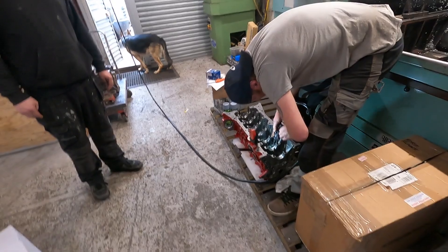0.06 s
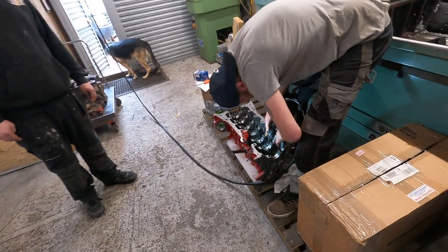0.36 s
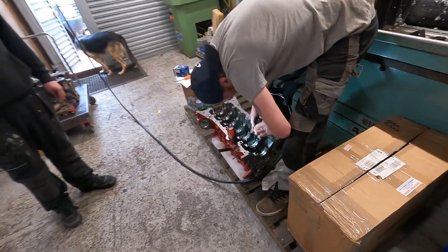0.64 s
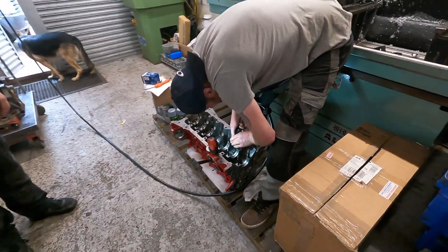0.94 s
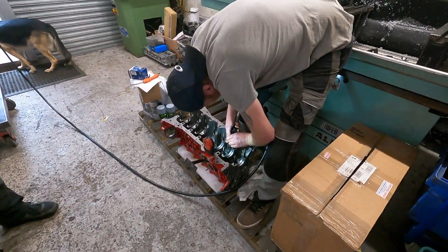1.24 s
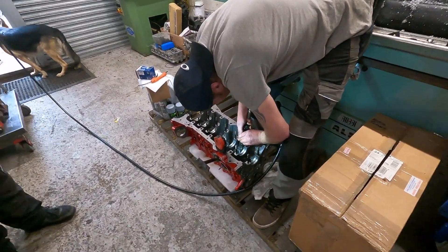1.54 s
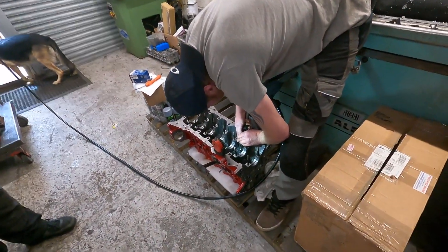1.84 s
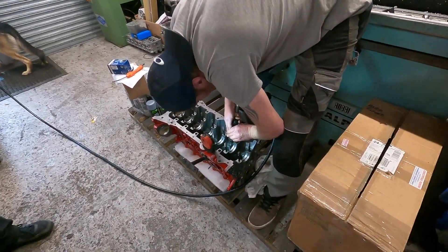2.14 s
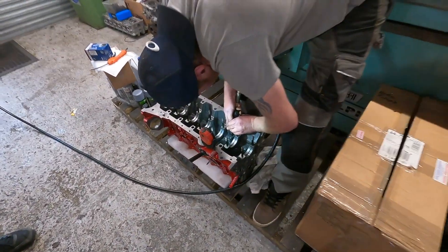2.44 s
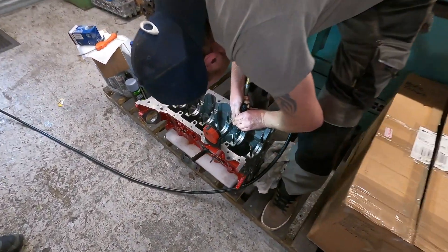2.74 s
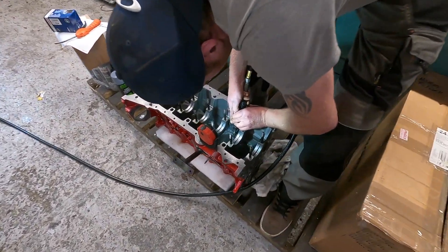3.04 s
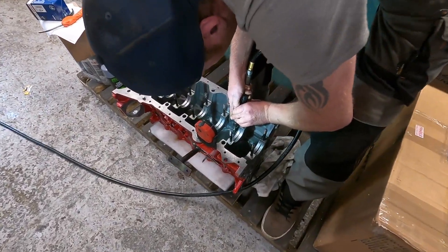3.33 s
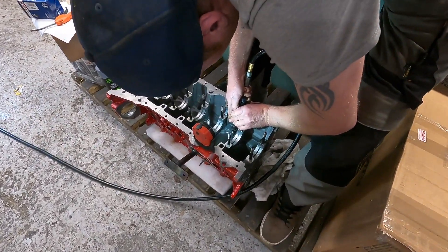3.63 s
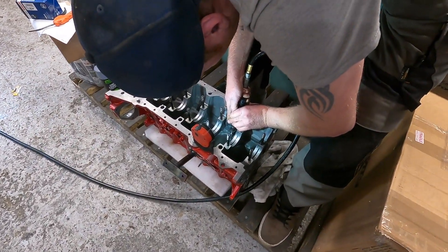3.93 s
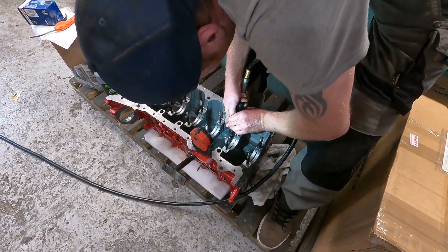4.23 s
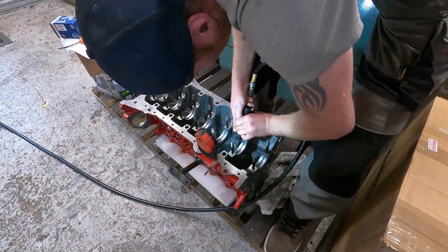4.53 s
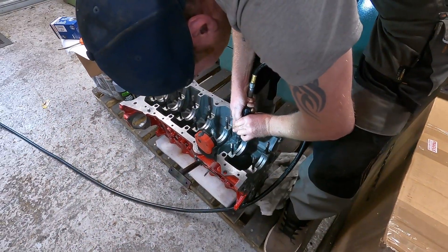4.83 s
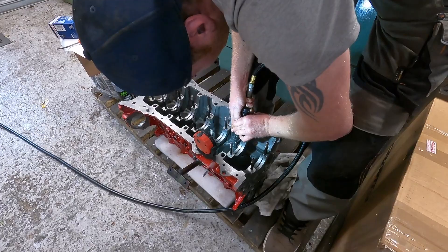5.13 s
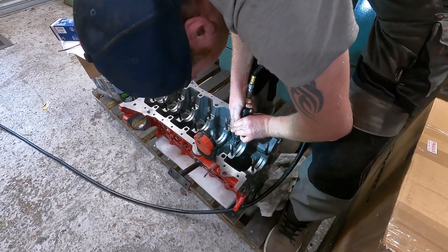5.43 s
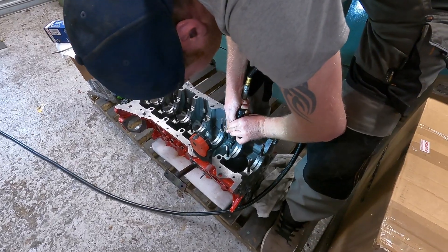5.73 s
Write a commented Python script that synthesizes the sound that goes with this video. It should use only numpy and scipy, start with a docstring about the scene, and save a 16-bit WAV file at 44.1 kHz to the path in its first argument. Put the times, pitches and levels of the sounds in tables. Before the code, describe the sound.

After soft scuffs and a leak of air, an air grinder whines up and grinds metal, chattering roughly, then cutting smoothly.

```python
"""An air die grinder works inside an iron engine block, heard close up in a workshop.
Someone shuffles about; the throttle cracks open and leaks air, then the vane motor spins up to a whine,
one puff of air per vane. The burr bounces on the iron and rasps off chips, then settles into a smooth
cut where each deeper bite slows the vanes and swells the whine."""
import sys
import numpy as np
from scipy import signal
from scipy.fft import rfft, irfft
from scipy.io import wavfile

SR = 44100
rng = np.random.default_rng(int(sys.argv[2]) if len(sys.argv) > 2 else 0)


def to_wav(sig):
    """Store sig (one row per channel, or 1-D mono) as 16-bit WAV at the path in sys.argv[1].

    Samples outside -1..1 are clipped; the rate is SR.
    """
    pcm = np.clip(np.atleast_2d(sig), -1, 1) * 32767
    pcm = np.round(pcm).astype(np.int16)
    wavfile.write(sys.argv[1], SR, pcm.T)  # frames by channels


N = 258867
T = np.arange(N) / SR
HZ = np.fft.rfftfreq(N, 1 / SR)
VANES = 5
START_S, SETTLE_S = 1.855, 4.37  # rotor breaks free; chatter stops

# thumb on the throttle: time_s, opening (0-1)
THROTTLE = [(1.27, 0.01), (1.75, 0.35), (1.82, 0.88), (1.89, 0.97)]
# motor speed before sag and sway: time_s, vane_hz
SPEED = [(1.855, 90), (1.903, 546), (1.95, 775), (2.05, 942), (2.28, 1143), (2.43, 1222), (2.62, 1270),
         (3.3, 1250), (3.7, 1223), (4.0, 1254), (4.36, 1279), (4.372, 1230)]
# burr pressure on the iron: time_s, pressure_db
PRESSURE = [(1.95, -9), (2.35, -2), (2.8, -1), (3.3, -2), (3.87, -1), (4.2, -2.5), (4.45, -8), (5.3, -6.5),
            (5.7, -2.5)]
# spectrum of scrape and air spit: freq_hz, density_db
BRIGHT_HISS = [(2500, -33), (3600, -6.5), (4500, -3.5), (5400, -1.5), (7600, -1), (8400, -5.5), (9300, -10),
               (12200, -11.5), (14000, -26), (15600, -44)]
# spectrum of the shaken block: freq_hz, density_db
RUMBLE = [(20, -10), (45, -2), (90, 0), (160, -4.5), (300, -21.5), (600, -30)]


def amp(db):
    """Decibels to gain."""
    return 10 ** (np.asarray(db) / 20)


def unit(x):
    """Scale to rms 1."""
    return x / np.sqrt(np.mean(x ** 2) + 1e-20)


def read(points, hz):
    """Interpolate on a log-frequency axis."""
    freq_hz, value = np.transpose(points)
    return np.interp(np.log(hz + 1), np.log(freq_hz + 1), value)


def curve(rows, column=1):
    """One column of a time table, per sample."""
    rows = np.array(rows)
    return np.interp(T, rows[:, 0], rows[:, column])


def level(rows, column):
    """Gain from a dB column, falling 500 dB/s outside the table's times."""
    outside_s = np.maximum(rows[0][0] - T, 0) + np.maximum(T - rows[-1][0], 0)
    return amp(curve(rows, column) - 500 * outside_s)


def ramp(start_s, length_s):
    """Linear rise from 0 to 1."""
    return np.clip((T - start_s) / length_s, 0, 1)


def held(start_s, end_s, attack_s, t60_s):
    """Attack, hold until end_s, decay."""
    return ramp(start_s, attack_s) * amp(-60 * np.maximum(T - end_s, 0) / t60_s)


def noise():
    """White noise."""
    return rng.standard_normal(N)


def colour(x, spectrum):
    """Filter by a dB spectrum; rms 1."""
    return unit(irfft(rfft(x) * amp(read(spectrum, HZ)), N))


def wander(rate_hz):
    """Random drift up to rate_hz; rms 1."""
    return unit(irfft(rfft(noise()) / (1 + (HZ / rate_hz) ** 4), N))


def resonate(x, hz, width_hz):
    """Steep resonance whose centre may glide; rms 1."""
    carrier = np.exp(2j * np.pi * np.cumsum(hz * np.ones(N)) / SR)
    pole = np.exp(-np.pi * width_hz / SR)
    baseband = signal.lfilter([(1 - pole) ** 2], [1, -2 * pole, pole * pole], x / carrier)
    return unit((carrier * baseband).real)


def hush():
    """Steady background noise of the shop."""
    spectrum = [(25, -9), (80, -11), (150, 4), (400, -8), (1200, -3.5), (1900, -9), (2400, -5), (3400, -12),
                (4500, -5.5), (7500, -10.5), (9700, -15.5), (12200, -17), (14000, -24), (15600, -40)]  # freq_hz, density_db
    return amp(-50.5) * colour(noise(), spectrum)


def footwork(scuff_t60_s=0.68):
    """Shoes and clothes shuffle; each soft knock carries a scuff."""
    shuffles = [(.1, 0.13, -47), (0.28, .04, -48), (0.385, 0.13, -49.5), (0.548, 0.035, -48.5),
                (0.702, 0.089, -47), (0.928, .07, -53), (1.32, .13, -51.5), (1.594, .15, -43)]  # start_s, length_s, relative_db
    cloth_spectrum = [(65, -54), (110, -24), (139, -2.5), (189, -4), (382, -2), (470, -7), (712, -7),
                      (773, -8), (3000, -18), (3900, -50), (6600, -120)]  # freq_hz, density_db
    knocks = [(.304, -43, 70, .06, -71), (0.732, -43, 165, 0.1, -46), (.89, -55, 38, .4, -74),
              (.945, -49, 522, 0.19, -57), (1.614, -39, 343, .07, -69), (1.684, -43, 300, .08, -59)]  # start_s, peak_db, pitch_hz, t60_s, scuff_db
    grit_spectrum = [(100, -23), (400, 5), (1300, -3), (3000, -8), (7000, -11), (14000, -34)]
    moves = sum(amp(db) * held(s, s + length_s, .025, 0.27) for s, length_s, db in shuffles)
    out = amp(-2) * moves * colour(noise() * (1 + 0.2 * wander(56)), cloth_spectrum)
    grit = colour(noise(), grit_spectrum)
    for start_s, peak_db, pitch_hz, t60_s, scuff_db in knocks:
        age_s = np.maximum(T - start_s, 0)
        out += amp(peak_db - 60 * age_s / t60_s) * np.sin(2 * np.pi * pitch_hz * age_s)
        out += amp(scuff_db - 60 * age_s / scuff_t60_s) * (T > start_s) * grit
    return out


def drone(from_hz=108, to_hz=126):
    """A brief low drone swells, rises a little and fades."""
    progress = ramp(1.06, 0.36)
    hz = (from_hz + (to_hz - from_hz) * progress) * (1 + 0.064 * wander(40))
    return amp(-50) * np.sin(np.pi * progress) ** 2 * unit(np.sin(2 * np.pi * np.cumsum(hz) / SR))


def airflow(range_db):
    """Throttle gain: about range_db down when cracked, 1 at full opening."""
    return ramp(THROTTLE[0][0], 0.016) * amp(-range_db * (1 - curve(THROTTLE)))


def leak():
    """Air slips past the throttle with a breathy whistle that fades during spin-up."""
    spectrum = [(290, -53), (500, -17), (560, -14), (724, -14.5), (1450, -1), (1830, -11), (2360, -1),
                (2880, -10), (3370, -8.5), (3880, -12.5), (5160, -8.5), (7470, -12), (9380, -22.5),
                (11400, -22.5), (15000, -42)]  # freq_hz, density_db
    open_s = THROTTLE[0][0]
    rush = amp(-29) * airflow(range_db=10) * held(open_s, 2.17, .005, t60_s=1.6)
    whistle = amp(-28.5) * airflow(range_db=26) * held(open_s, 2.254, .005, t60_s=0.99)
    return rush * colour(noise(), spectrum) + whistle * resonate(noise(), hz=2395, width_hz=75)


def motor_air():
    """Strength of the air passing through the motor."""
    return amp(-22.5) * airflow(range_db=45)


def exhaust(turns, puff_depth=.3):
    """Spent air hisses out in puffs and howls in the crankcase, surging as the chatter stops."""
    spectrum = [(100, -38), (200, -20.5), (330, -13.5), (450, -21.5), (600, -14.5), (850, -17), (1050, -6),
                (1750, -4.5), (2400, 0), (3500, -3), (5200, -7.5), (7200, -9), (9000, -18), (12500, -20),
                (14200, -25), (15700, -43)]  # freq_hz, density_db
    # exhaust and crankcase resonances: centre_hz, width_hz, relative_db, smooth_cut_gain_db
    cavity_modes = [(1138, 98, -7.5, 2.5), (2059, 230, 0, -1.5), (2318, 240, -2, 2.5), (2505, 170, -0.5, 3),
                    (2728, 150, -3, 4), (2947, 120, -1.5, 3)]
    settled = ramp(SETTLE_S, .01)
    jet = noise() * (1 + puff_depth * np.cos(2 * np.pi * VANES * turns))
    rush = amp(-0.16 + 0.76 * settled) * colour(jet, spectrum)
    howl = sum(amp(db + gain_db * ramp(SETTLE_S, 0.0086)) * resonate(noise(), hz, width_hz)
               for hz, width_hz, db, gain_db in cavity_modes)
    surge_db = 4 * held(SETTLE_S, SETTLE_S + 0.024, .005, t60_s=0.27)
    swell_db = 0.5 * settled * wander(8)
    gusts = 1 + 0.037 * wander(40)
    return motor_air() * gusts * (rush + amp(-9 + surge_db + swell_db) * howl)


def spit(attack_s=0.026):
    """Bright spit of air as the throttle is squeezed wide."""
    wide_s = THROTTLE[2][0]
    envelope = held(wide_s - attack_s / 2, wide_s + attack_s / 2, attack_s, t60_s=0.59)
    return amp(-31) * envelope * colour(noise(), BRIGHT_HISS)


def cough(attack_s=.014, length_s=0.077):
    """The rotor breaks free with a burst of air and a faint after-rush."""
    spectrum = [(40, -23), (80, -6), (180, -5), (280, 5), (420, -4), (550, -3), (1200, 4.5), (1700, -4),
                (3000, -39)]  # freq_hz, density_db
    burst = amp(-30) * held(START_S, START_S + length_s, attack_s, t60_s=0.25)
    after_rush = amp(-51) * held(START_S, START_S + length_s, attack_s, t60_s=1.6)
    return (burst + after_rush) * colour(noise(), spectrum)


def kick(pitch_hz=278):
    """The starting rotor's jolt thumps through the block."""
    ring = np.sqrt(2) * amp(-29) * np.sin(2 * np.pi * pitch_hz * T)
    thud = amp(-38) * colour(noise(), RUMBLE)
    return held(START_S, START_S + 0.038, 0.018, t60_s=0.12) * (ring + thud)


def bite_depth():
    """The burr digs in and eases off during the smooth cut."""
    bites = [(4.555, 0.21, 0.98), (4.799, 0.091, 0.74), (5.15, .22, .85), (5.286, 0.1593, 0.47),
             (5.85, 0.12, 0.36)]  # middle_s, length_s, depth (0-1)
    return sum(depth * np.cos(np.pi * np.clip((T - middle_s) / length_s, -.5, .5)) ** 2
               for middle_s, length_s, depth in bites)


def shaft_turns(sag_hz=19, jitter=0.0027, sway=0.00299):
    """Running count of rotor turns; speed trembles, sways in the hand and sags at each bite."""
    vane_hz = curve(SPEED) - sag_hz * bite_depth()
    return np.cumsum(vane_hz * (1 + jitter * wander(46) + sway * wander(8))) / SR / VANES


def vane_gain(bite_db=9.5, fade_db_per_s=0.5):
    """The whine grows with speed, loses strength to the chatter and returns in the smooth cut."""
    vane_hz = curve(SPEED)
    free_db = np.maximum(-28 - 20 * (1 - vane_hz / vane_hz.max()), -35)
    rough_db = free_db - 9 * ramp(2.4, .4)
    smooth_db = -30 + bite_db * bite_depth() - fade_db_per_s * (T - SETTLE_S)
    settled = ramp(SETTLE_S, .006)
    return ramp(START_S, 0.014) * amp((1 - settled) * rough_db + settled * smooth_db)


def whine(turns, flutter=0.16, slip_turns=0.014):
    """One puff per vane, sputtering at first; unequal vanes and burr teeth add other shaft orders."""
    partials = [(2.5, -41, 10.5), (3, -34.5, 7.5), (4, -47, -3), (5.5, -22, 4.5), (6.5, -42, -10),
                (7, -29, -5), (10, -10, 2), (11, -35, 2), (12, -22.5, 9.5)]  # shaft_order, relative_db, smooth_cut_gain_db
    sputter = .6 * held(START_S, START_S + 0.071, .01, t60_s=1.418)
    vanes = vane_gain() * np.sin(2 * np.pi * VANES * turns + sputter * wander(120))
    orders = np.zeros(N)
    for order, db, gain_db in partials:
        cycles = order * (turns + slip_turns * wander(36)) + rng.random()
        gain = amp(db + gain_db * ramp(SETTLE_S, .01)) * (1 + 0.49 * wander(28))
        orders += gain * np.sin(2 * np.pi * cycles)
    vanes *= 1 + (flutter + sputter) * wander(45)
    up_to_speed = ramp(1.94, 0.5)
    return np.sqrt(2) * (vanes + amp(-.5) * up_to_speed * motor_air() * orders)


def rasp(turns, chips_per_s=17000):
    """Teeth tear off chips and squeal; the scrape quietens and a thin hiss near 13 kHz comes in."""
    tooth_squeal = [(2.1, 7300, -41), (2.5, 7200, -37), (2.9, 6160, -28.5), (3.4, 5938, -27.5),
                    (3.95, 5958, -27), (4.25, 5975, -33), (4.5, 6715, -34), (5.87, 6761, -32)]  # time_s, pitch_hz, level_db
    high_hiss_bands = [(12800, 800, 3), (14000, 1900, -4)]  # centre_hz, width_hz, relative_db
    contact = 1 + 0.073 * np.sin(np.pi * turns) + 0.082 * wander(45)
    chips = noise() * (rng.random(N) < chips_per_s / SR) * contact
    scrape_db = -24.5 + curve(PRESSURE) - 8 * ramp(SETTLE_S - .4, 0.55)
    scrape = ramp(START_S, .02) * amp(scrape_db) * colour(chips, BRIGHT_HISS)
    squeal = resonate(noise() * contact, curve(tooth_squeal), width_hz=1180)
    squeal *= amp(-0.3) * level(tooth_squeal, column=2)
    high_hiss = unit(sum(amp(db) * resonate(chips, hz, width_hz) for hz, width_hz, db in high_hiss_bands))
    return scrape + squeal + amp(-41) * ramp(SETTLE_S, 0.17) * high_hiss


def shake():
    """Block and pallet rumble under the pressure, less once the chatter stops."""
    level_db = -44 + 2.5 * curve(PRESSURE) - 5 * ramp(SETTLE_S, .1)
    return ramp(START_S, .02) * amp(level_db) * colour(noise(), RUMBLE)


def chatter(turns, jitter=0.00915, full_hz=985, loss_db_per_hz=0.2):
    """The burr bounces at its own rate, weakly when slow, harder on one side of each wobble."""
    bounces = [(2.3, 1060), (2.47, 895), (2.61, 920), (2.8, 1020), (3.02, 990), (3.11, 1074), (3.62, 1135),
               (3.96, 1003), (4.36, 988)]  # time_s, rate_hz
    rate_hz = curve(bounces)
    phase = 2 * np.pi * np.cumsum(rate_hz * (1 + jitter * wander(70.7))) / SR
    tone = np.sin(phase) + amp(-8) * np.sin(2 * phase)
    tone *= 1 + .4 * np.sin(np.pi * turns) + .28 * wander(55)
    level_db = -31.5 - loss_db_per_hz * np.maximum(full_hz - rate_hz, 0)
    return held(bounces[0][0], SETTLE_S, 0.022, t60_s=.03) * amp(level_db) * unit(tone)


def wobble(turns):
    """The unbalanced burr hums in spells, at the shaft rate and half of it."""
    spells = [(2.45, 3.096, -50.5, -47), (3.152, 4.25, -50, -52), (4.8, 5.17, -59.5, -54),
              (5.202, 5.87, -47.5, -62)]  # start_s, end_s, half_rate_db, shaft_rate_db
    hum = np.zeros(N)
    for start_s, end_s, half_db, shaft_db in spells:
        tone = amp(half_db) * np.sin(np.pi * turns) + amp(shaft_db) * np.sin(2 * np.pi * turns)
        hum += held(start_s, end_s, 0.062, t60_s=.5) * tone
    return np.sqrt(2) * amp(-2) * hum * (0.95 + 0.34 * wander(13))


def hiss(turns):
    """All rushing air and scraping over the shop's hush; fresh noise on each call."""
    return leak() + spit() + cough() + exhaust(turns) + rasp(turns) + hush()


def workshop(x, reflections_per_s=1500, near_t60_s=0.057):
    """Quick reflections off block and floor, then the room's tail."""
    room_decay = [(100, 0.38), (1000, 0.35), (4000, 0.33), (14000, 0.16)]  # freq_hz, t60_s
    t = T[:SR // 2]
    near = rng.standard_normal(len(t)) * (rng.random(len(t)) < reflections_per_s / SR)
    near *= (t > .003) * amp(-60 * t / near_t60_s)
    hz, age_s, bands = signal.stft(rng.standard_normal(len(t)) * (t > .012), SR, nperseg=256)
    bands *= amp(-60 * age_s / read(room_decay, hz)[:, None])
    tail = signal.istft(bands, SR, nperseg=256)[1][:len(t)]
    echo = amp(-11) * near / np.linalg.norm(near) + amp(-12) * tail / np.linalg.norm(tail)
    return signal.fftconvolve(x, echo)[:N]


def ports(mid, side, image):
    """Left and right microphone signals from mid and side spectra."""
    image = np.array(image)
    left_db, lead_rad = read(image[:, [0, 1]], HZ), read(image[:, [0, 2]], HZ)
    tilt = amp(left_db / 2) * np.exp(.5j * lead_rad)
    return irfft(np.array([(mid + side) * tilt, (mid - side) / tilt]), N)


def scene(tone_send=0.37):
    """Direct sound reaches both ports; the part scattered by the shop differs between them."""
    scatter = [(50, -24), (200, -13), (600, -10.5), (1100, -12.5), (2200, -10), (4300, -8), (7000, -10),
               (10000, -10), (12500, -6.5), (15000, -1)]  # scattered hiss: freq_hz, gain_db
    # opening stereo image, slightly right: freq_hz, left_minus_right_db, left_lead_rad
    wide_image = [(50, -4, 0), (120, -0.5, 0), (700, -0.5, -0.074), (2500, -1.1, -0.4), (5000, -1, -0.22),
                  (9000, -0.2, -.1), (13000, -1, 0.82), (15000, -8, .5)]
    # from 4.37 s the stereo image narrows to near mono, except in bass and top:
    # freq_hz, left_minus_right_db, left_lead_rad, side_db
    narrow_image = [(100, -0.5, 0, -2), (716, 1, 0, -2.5), (1010, 0, 0, -23), (2200, 0, 0, -61),
                    (7000, 0, 0, -42), (9500, 1, 0, -4), (11400, -2, 0.4, 2), (12700, -9.5, 2.4, 2),
                    (15200, -2, .5, 2)]
    turns = shaft_turns()
    tones = whine(turns) + chatter(turns) + wobble(turns) + shake() + kick() + drone() + footwork()
    air = hiss(turns)
    mid = rfft(air + tones + workshop(air + tone_send * tones))
    side = rfft(hiss(turns)) * amp(read(scatter, HZ)) + amp(-5) * rfft(workshop(tones))
    narrow_side = side * amp(read([(hz, db) for hz, _, _, db in narrow_image], HZ))
    narrow = ramp(4.37, 0.014)
    return (1 - narrow) * ports(mid, side, wide_image) + narrow * ports(mid, narrow_side, narrow_image)


def record(dry):
    """Steep low-pass at 15750 Hz."""
    taps = signal.firwin(511, 15750, window=("kaiser", 9), fs=SR)
    return signal.oaconvolve(dry, taps[None], "same")


dry = scene()
out = record(dry)
to_wav(out)
```